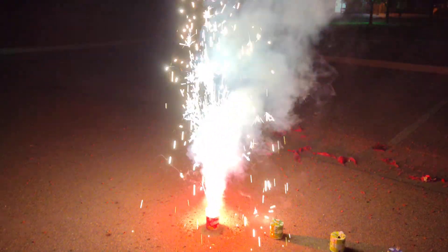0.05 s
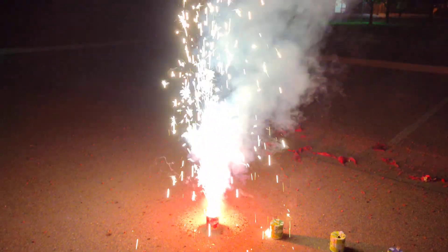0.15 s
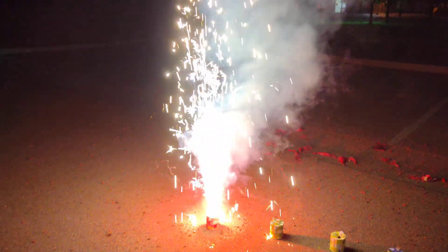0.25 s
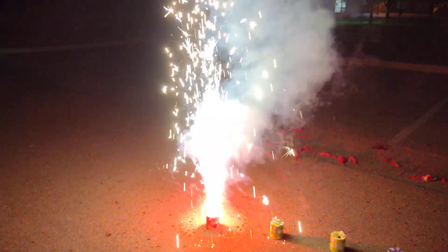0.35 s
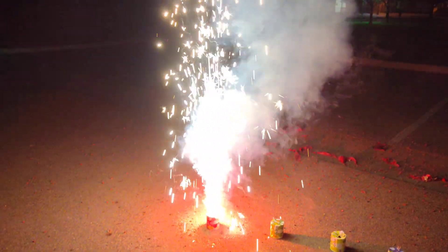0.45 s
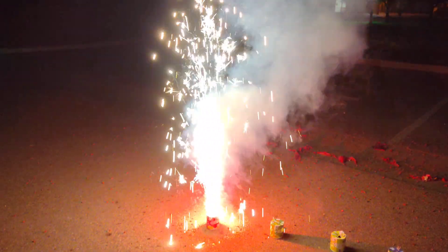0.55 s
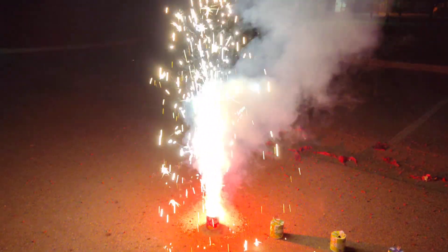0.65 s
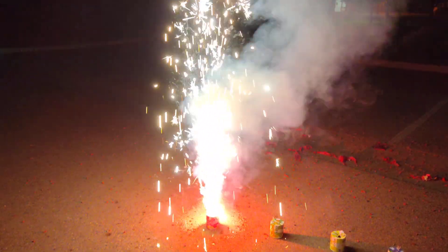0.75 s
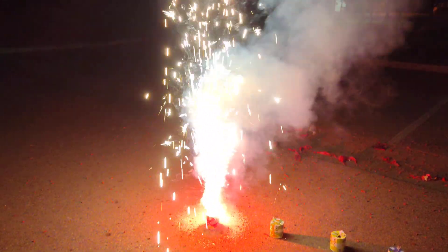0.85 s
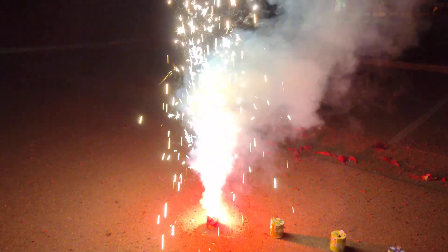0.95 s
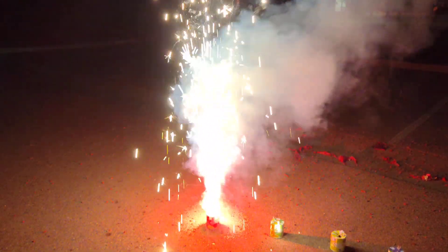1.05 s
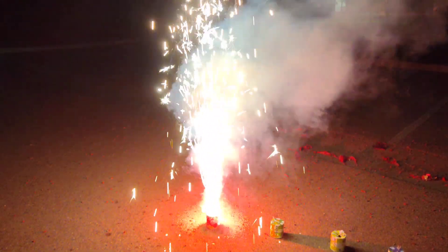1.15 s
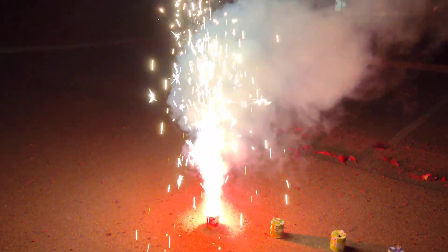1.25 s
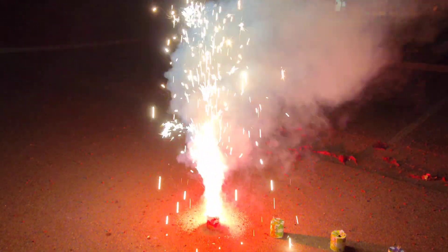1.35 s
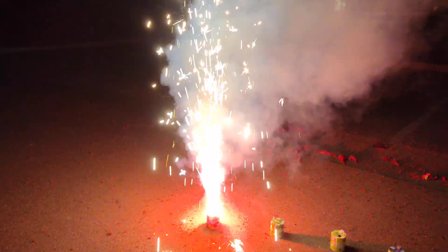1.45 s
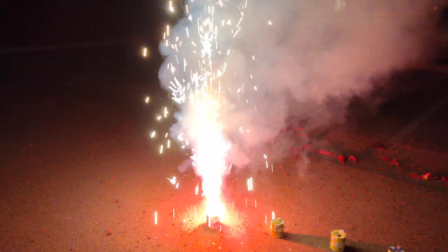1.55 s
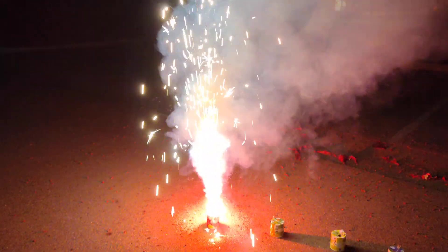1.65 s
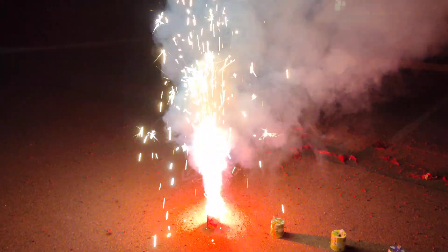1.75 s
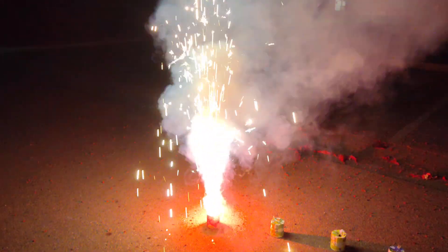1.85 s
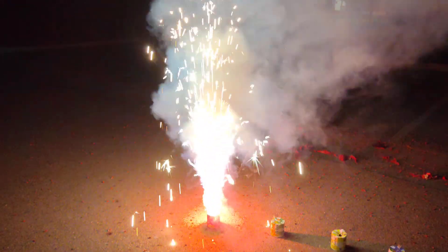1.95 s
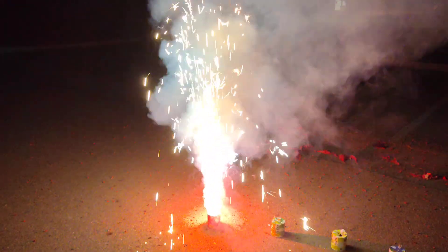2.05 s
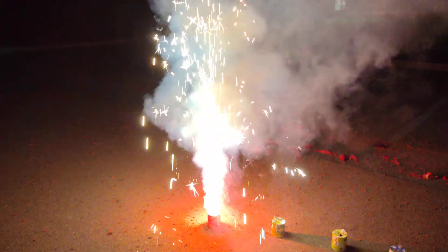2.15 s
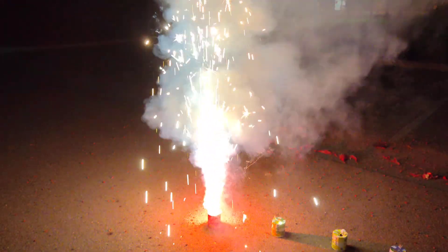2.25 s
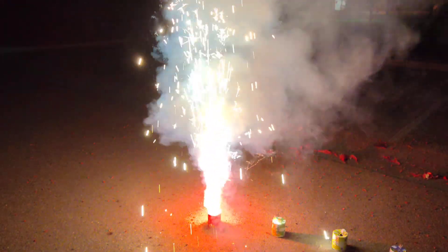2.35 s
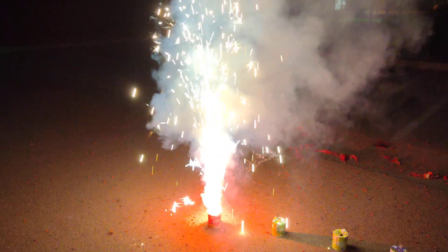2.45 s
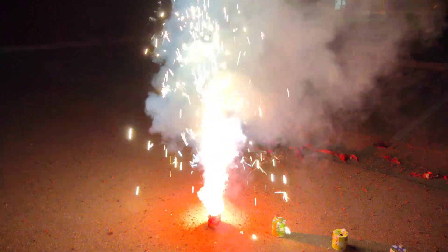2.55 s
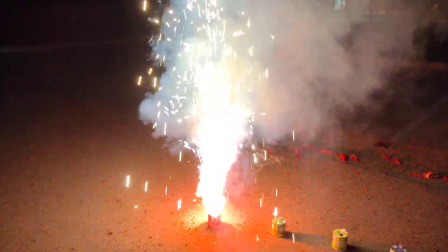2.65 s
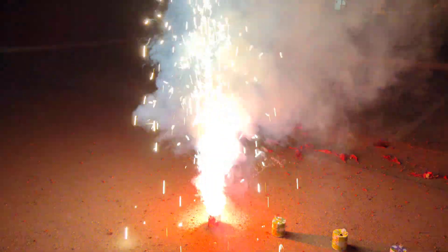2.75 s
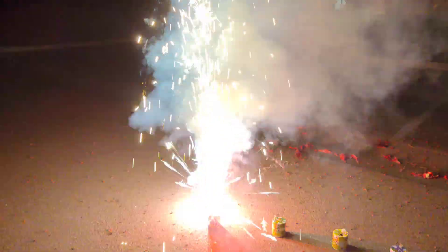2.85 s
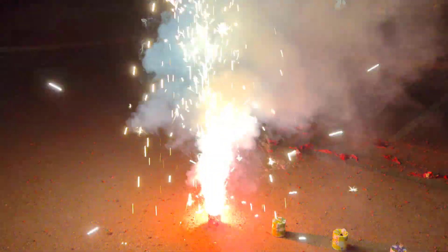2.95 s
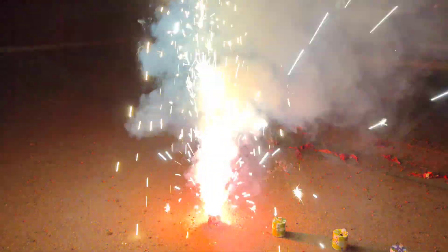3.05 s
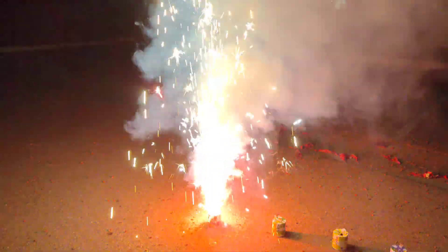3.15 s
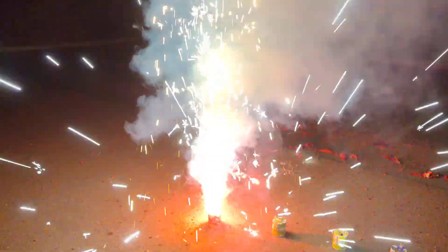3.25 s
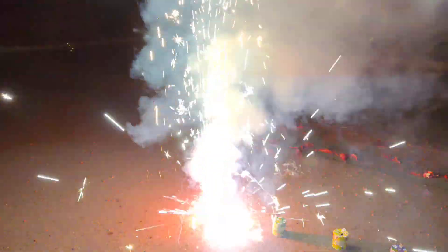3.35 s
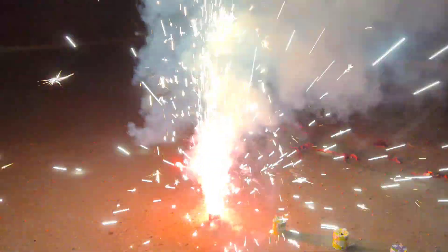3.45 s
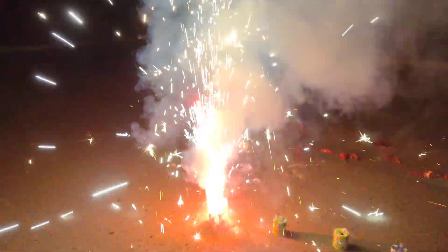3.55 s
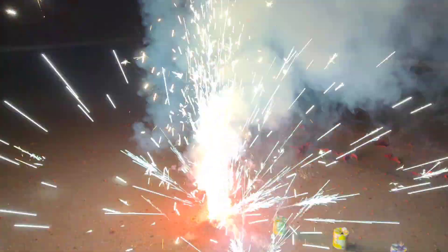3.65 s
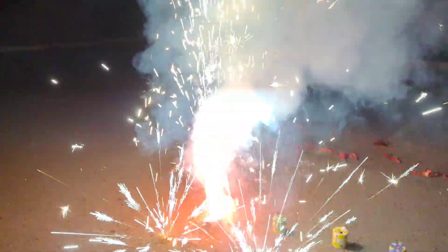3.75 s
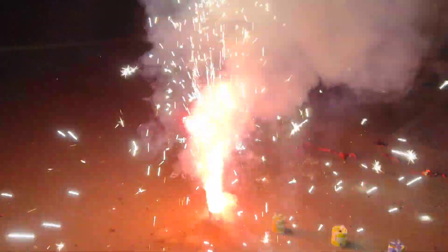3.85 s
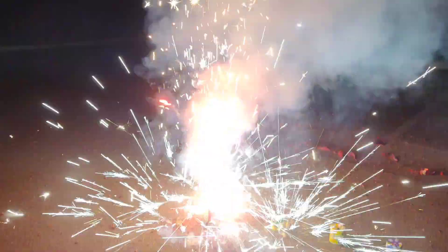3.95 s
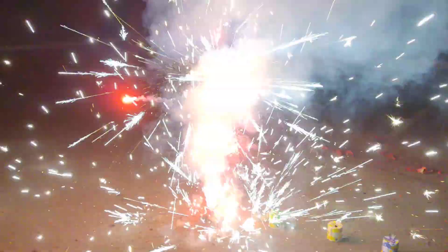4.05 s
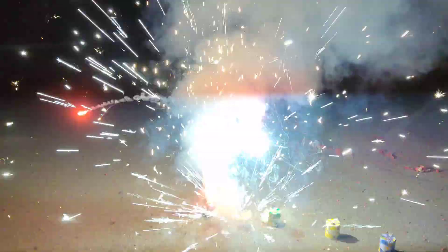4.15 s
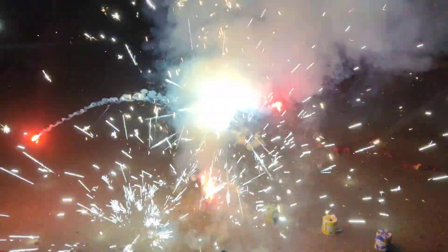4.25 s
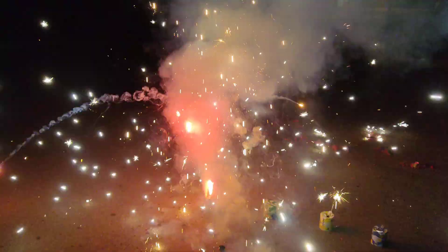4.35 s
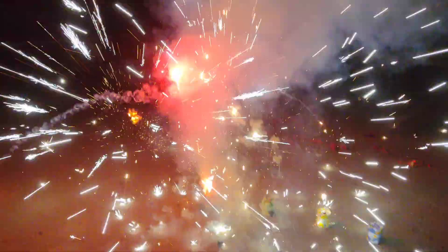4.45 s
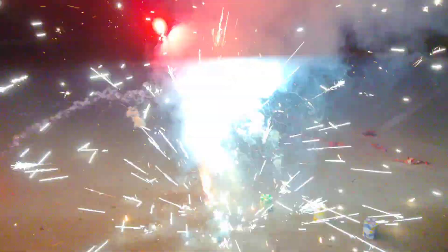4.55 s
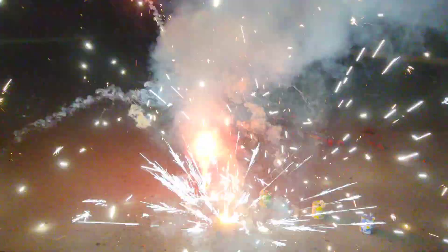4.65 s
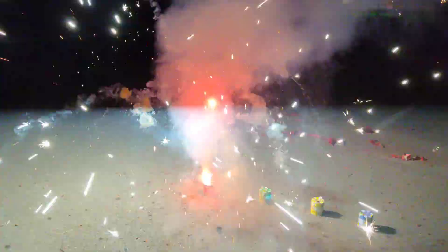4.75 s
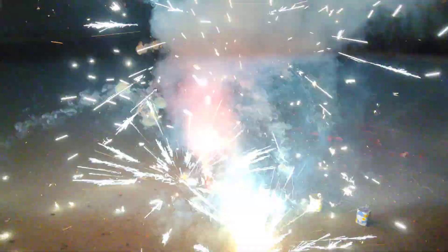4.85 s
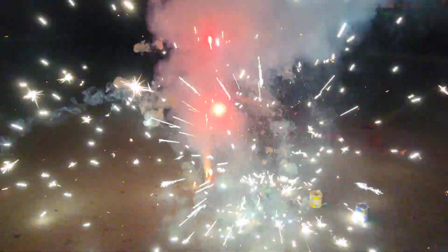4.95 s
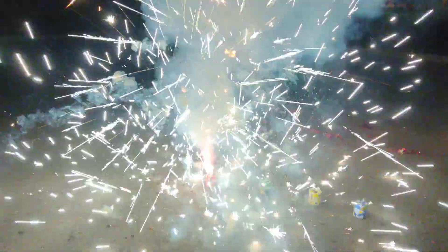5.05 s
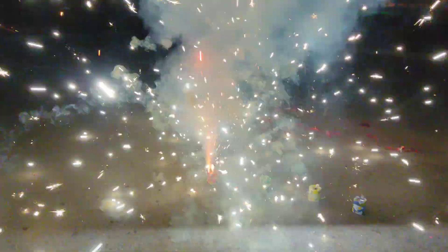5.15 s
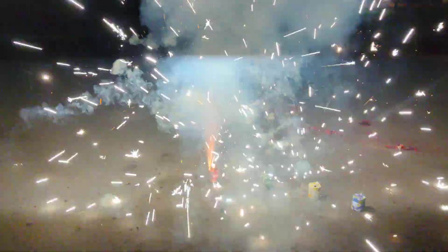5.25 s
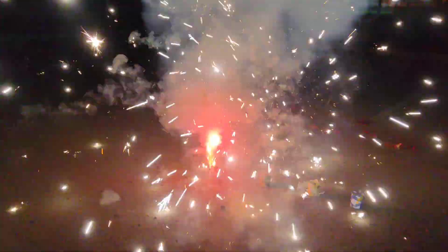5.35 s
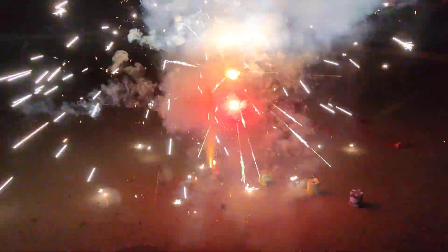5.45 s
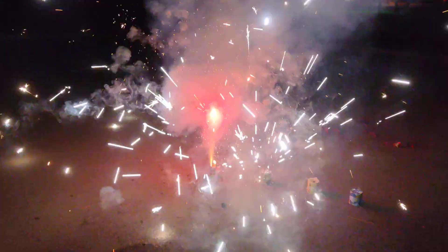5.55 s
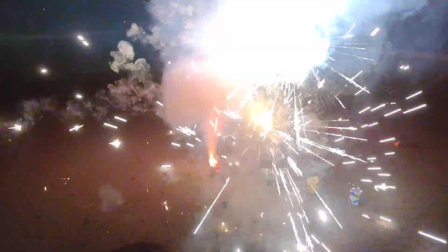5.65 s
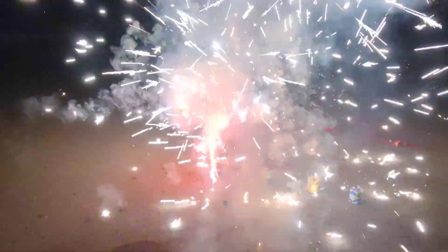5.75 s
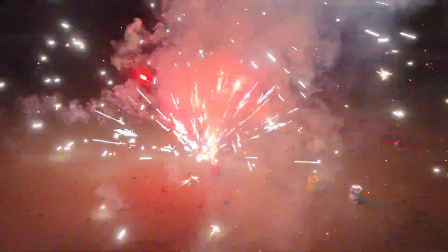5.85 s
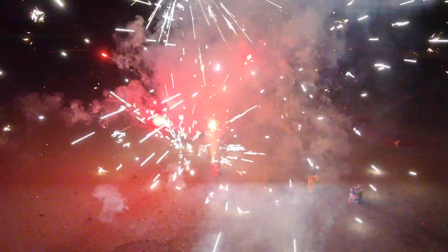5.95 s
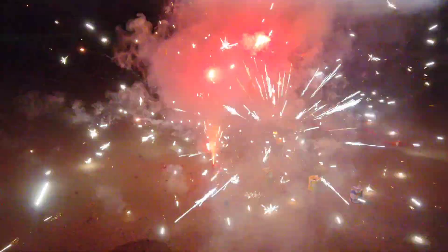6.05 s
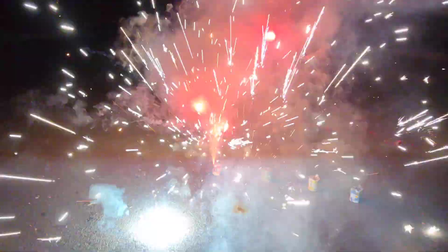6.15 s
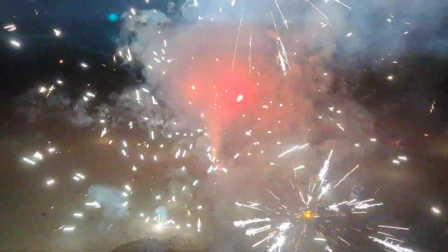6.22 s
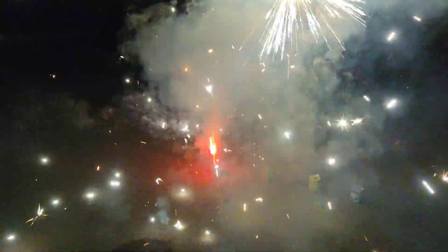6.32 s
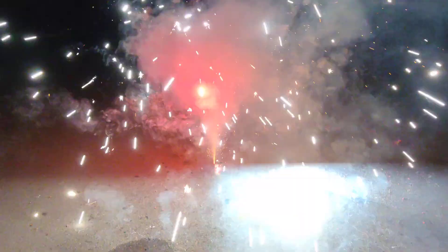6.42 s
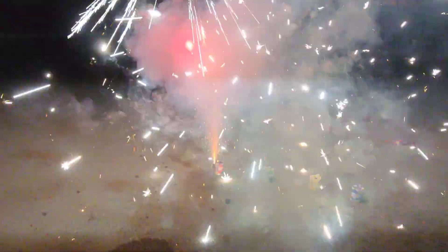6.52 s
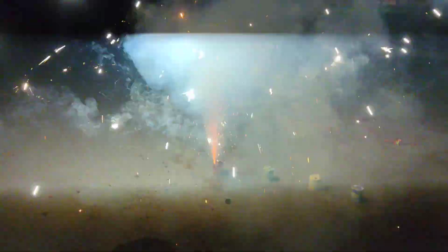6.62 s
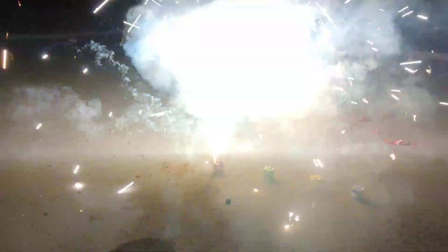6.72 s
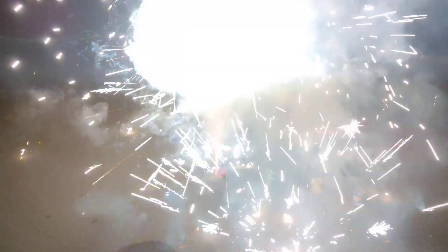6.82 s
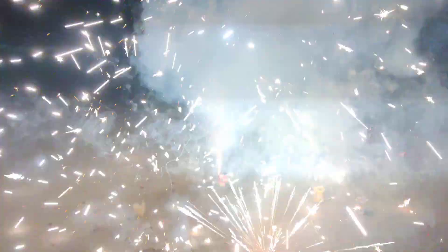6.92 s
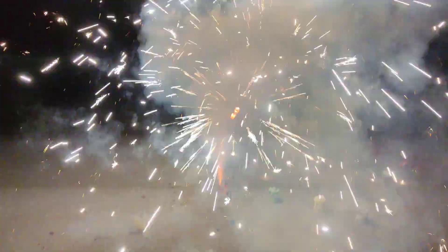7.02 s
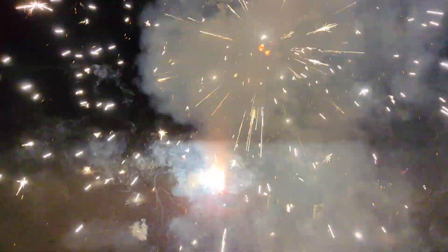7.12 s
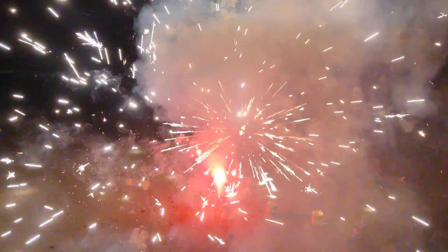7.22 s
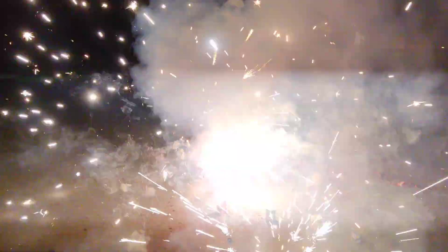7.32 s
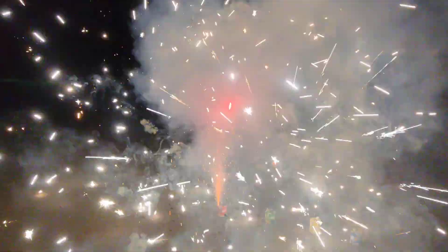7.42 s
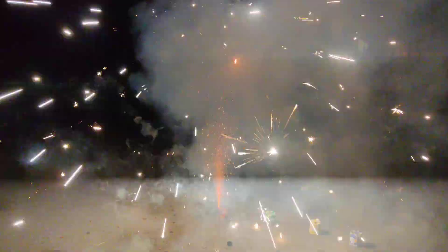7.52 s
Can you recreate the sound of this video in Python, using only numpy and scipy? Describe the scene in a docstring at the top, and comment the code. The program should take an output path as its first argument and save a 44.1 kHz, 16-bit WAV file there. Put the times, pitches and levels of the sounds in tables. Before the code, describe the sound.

A small ground firework hisses and roars outdoors, then breaks into loud, dense, rapid crackling with sharp bangs and a deep boom underneath.

```python
"""A small fountain firework burns on asphalt at night: first its jet roars, hisses and puffs.
From 2.6 s crackling stars take over, over a deep boom, while the roar dies away and the hiss goes on.
Each star is a noise crack echoed by the ground, with a dull blast; it may set off a lesser one.
Its sparks, dense random ticks, fizz a moment later; swarms and quick volleys thicken the crackle.
The blasts overload two microphone ports, and the gain control sinks at each bang."""
import sys
import numpy as np
from scipy import signal
from scipy.fft import rfft, irfft, next_fast_len
from scipy.io import wavfile
from scipy.ndimage import uniform_filter1d, map_coordinates

SR = 44100
rng = np.random.default_rng(int(sys.argv[2]) if len(sys.argv) > 2 else 0)


def transcribe(u):
    """Save the signal u as a 16-bit wav file named by the first command-line argument.

    u: samples, shape (n,) or (channels, n), limited to [-1, 1]; the rate is SR.
    q: integer samples, one column per channel.
    """
    v = np.clip(np.atleast_2d(u).T, -1, 1)
    q = np.round(v * 32767).astype(np.int16)
    wavfile.write(sys.argv[1], SR, q)


N = 334278

LIFT_DB = 9.5  # gain added while nothing bangs
JET_LEAN_DB, CRACKLE_LEAN_DB = -0.5, 0.88  # added left, taken off right


def amp(db):
    """Decibels to gain."""
    return 10 ** (np.asarray(db) / 20)


def unit(x):
    """x at rms 1."""
    return x / np.sqrt(np.mean(x ** 2) + 1e-20)


def lean(db):
    """Left and right gains."""
    return amp(db * np.array([[1], [-1]]))


def along(points, hz):
    """(f/Hz, value) points read on a log-frequency axis."""
    f, v = np.transpose(points)
    return np.interp(np.log(hz + 1), np.log(f + 1), v)


def curves(rows):
    """One value per sample for each column after the time."""
    s, *cols = np.transpose(rows)
    return [np.interp(np.arange(N) / SR, s, c) for c in cols]


def wobble(rate_hz):
    """Smooth random curve, rate_hz knots a second."""
    knots = rng.standard_normal(int(N * rate_hz / SR) + 4)
    return map_coordinates(knots, [np.arange(N) * rate_hz / SR])


def fall(t, life_s):
    """Exponential decay that starts at t = 0."""
    return (t >= 0) * np.exp(-np.abs(t) / life_s)


def swell(s, rise_s, fall_s):
    """Bell-shaped envelope that tops at s seconds."""
    t = np.arange(N) / SR - s
    return np.exp(-(t / np.where(t < 0, rise_s, fall_s)) ** 2 / 2)


def add(track, s, sound):
    """Mix a sound into a track at s seconds."""
    part = track[:, round(s * SR):][:, :sound.shape[-1]]
    part += sound[..., :part.shape[1]]


def filtered(x, response):
    """x times a complex response of frequency."""
    m = next_fast_len(N + SR // 2)
    return irfft(rfft(x, m) * response(np.fft.rfftfreq(m, 1 / SR)), m)[..., :N]


def reflected(x, paths):
    """x with its early reflections added."""
    def response(hz):
        return 1 + sum(gain * np.exp(-2j * np.pi * hz * s) for s, gain in paths)
    return filtered(x, response)


def pair(own, size):
    """Stereo white noise: a common part plus each side's own."""
    return (rng.standard_normal(size) + own * rng.standard_normal((2, size))) / np.hypot(1, own)


def ticks(rate_hz, spread_db, lag_samples=12):
    """Random impulses of log-normal size, rms 1, each with its own lag at the two ports."""
    count = int(rate_hz * N / SR)
    draw = rng.random((count, 3))
    chance = rng.standard_normal((count, 3))
    at = (draw[:, :1] * (N - lag_samples) + draw[:, 1:] * lag_samples).astype(int)
    level_db = spread_db * np.clip(chance[:, :1], -2, 2) + 2 * chance[:, 1:]
    sizes = np.sign(chance[:, 1:]) * amp(level_db)
    return unit(np.array([np.bincount(at[:, side], sizes[:, side], N) for side in (0, 1)]))


def patchy(x, depth_db, size=5):
    """Colour that shifts from one moment and band to the next."""
    z = signal.stft(x, nperseg=256)[2]
    field = uniform_filter1d(rng.standard_normal(z.shape), size, 2)
    field = uniform_filter1d(field, size - 2, 1)
    return signal.istft(z * amp(depth_db * unit(field)), nperseg=256)[1][:, :N]


# resonance of each microphone port: f/Hz, level/dB
LEFT_PORT = [(500, -1), (1200, 2), (2000, 2), (3000, 3), (4000, 7), (4750, 10.5), (5300, 10), (5800, 6.5),
             (7000, 5.5), (8000, -2), (9500, -1), (11500, -7.5), (15000, -11.5)]
RIGHT_PORT = [(500, -2.5), (1800, 0.5), (3200, 1), (5000, 4.5), (6000, 8.5), (6850, 13), (7400, 6.5),
              (8000, 2), (9000, -4.5), (12000, -7), (13500, -7), (15000, -13)]


def through_ports(x, spectrum, size=8192):
    """x given a spectrum and rung through both ports: minimum phase, mean energy gain 1."""
    hz = np.fft.rfftfreq(size, 1 / SR)
    ports_db = np.array([along(LEFT_PORT, hz), along(RIGHT_PORT, hz)])
    gain = amp(along(spectrum, hz) + ports_db)
    cepstrum = irfft(np.log(gain))
    causal = np.r_[1, np.full(size // 2 - 1, 2), np.zeros(size // 2)]
    ring = irfft(np.exp(rfft(cepstrum * causal)))
    ring = ring / np.sqrt(np.sum(ring ** 2) / 2)
    return signal.fftconvolve(np.atleast_2d(x), ring, axes=1)[:, :N]


# deep boom between bangs: t/s, level/dB
BOOM_LEVEL = [(2.93, -75), (3.0, -33), (3.5, -34), (7.5, -33)]
# boom spectrum: f/Hz, density/dB per Hz
BOOM_SPECTRUM = [(10, -1), (30, -15), (60, -24), (150, -47), (600, -88)]


def deep_boom():
    """Low noise, steep towards the bass, that sets in as the stars take over."""
    return amp(curves(BOOM_LEVEL)[0]) * unit(through_ports(pair(own=0.7, size=N), BOOM_SPECTRUM))


# street decay: f/Hz, t60/s
STREET_DECAY = [(200, 0.26), (3000, 0.68), (12000, 0.97)]


def street(x):
    """Houses along the street answer faintly: a decaying noise tail whose treble lasts longest."""
    hz, t, z = signal.stft(rng.standard_normal((2, SR // 2)), SR, nperseg=256)
    decay = amp(-60 * t / along(STREET_DECAY, hz)[:, None])
    tail = signal.istft(z * decay, SR, nperseg=256)[1]
    return signal.fftconvolve(x, tail / np.linalg.norm(tail[0]), axes=1)[:, :N]


# jet hiss: t/s, level/dB
JET_HISS = [(0.0, -30), (0.05, -27), (0.135, -25), (0.155, -29.5), (0.27, -29), (0.62, -29.5), (1.05, -29),
            (1.75, -29), (2.1, -26), (2.25, -26.5), (2.57, -23), (2.66, -25), (2.74, -26), (2.92, -26),
            (4.5, -25)]
# low puffs of gas: t/s, level over the rumble/dB
PUFFS = [(0.17, 5), (1.29, 4), (1.5, 7), (2.35, 8.5)]
# jet spectra: f/Hz, density/dB per Hz; sputter = grains spitting in the flame
RUMBLE_SPECTRUM = [(20, -16), (35, -5), (55, -2), (95, 3.5), (130, -6.5), (220, -38)]
ROAR_SPECTRUM = [(80, -23), (140, -4), (260, 0.5), (390, -6.5), (540, 3.5), (680, -0.5), (800, -12),
                 (930, -15.5), (1500, -14), (3000, -57)]
HISS_SPECTRUM = [(950, -4.5), (1400, -2.5), (1950, 3.5), (2270, 0), (2500, 3.5), (2760, -1.5), (2980, 3),
                 (3900, -2.5), (4330, 1.5), (4560, -1), (4770, 1.5), (4980, -0.5), (5230, 1.5),
                 (5600, -2.5), (5900, -3.5), (6200, -5.5), (6700, -8.5), (9300, -6.5), (15000, -7.5)]
SPUTTER_SPECTRUM = [(1500, -14), (4000, 3), (8000, 8), (11000, -3), (15000, -6)]
# early reflections of the jet at each port: delay/s, gain (linear)
LEFT_PATHS = [(.00024, .69), (.00159, .4), (.001975, .23), (.00253, .16)]
RIGHT_PATHS = [(.000126, .34), (.00045, .31), (.00056, .25), (.00198, .14)]
PUFF_S = 0.056  # half length
# from here the jet's roar and rumble die away while its hiss goes on
FADE_START_S, FADE_DB_PER_S = 2.9, 13.5
ROAR_DB, RUMBLE_DB = -34, -44  # before the fade and LIFT_DB
ROAR_DB_PER_HISS_DB = 0.25
SPUTTER_DB, SPUTTER_DB_PER_HISS_DB = -9.5, 2.6  # level re mean hiss; growth


def jet(scattered=0.83, spit=0.58, flutter_db=0.52, heave_db=6.0):
    """Gas rushes from the tube: turbulent roar, hiss combed by near surfaces, sputter growing with effort."""
    fading_s = np.maximum(np.arange(N) / SR - FADE_START_S, 0)
    hiss_db, = curves(JET_HISS)
    effort_db = hiss_db - hiss_db.mean()

    puffs_db = sum(db * swell(s, PUFF_S, PUFF_S) for s, db in PUFFS)
    rumble_db = RUMBLE_DB + puffs_db + heave_db * wobble(5.4)
    rumble = amp(rumble_db) * through_ports(pair(own=0.1, size=N), RUMBLE_SPECTRUM)
    roar_db = ROAR_DB + ROAR_DB_PER_HISS_DB * effort_db + 1.5 * wobble(34.86)
    roar = amp(roar_db) * through_ports(pair(own=0.15, size=N), ROAR_SPECTRUM)

    nozzle = rng.standard_normal(N)
    grains = scattered * rng.standard_normal((2, N)) + spit * ticks(rate_hz=1600, spread_db=14.0)
    grains = grains + np.array([reflected(nozzle, LEFT_PATHS), reflected(nozzle, RIGHT_PATHS)])
    hiss = unit(through_ports(patchy(grains, depth_db=1.0, size=9), HISS_SPECTRUM))
    hiss = amp(hiss_db + flutter_db * wobble(90)) * hiss

    sputter_db = hiss_db.mean() + SPUTTER_DB + SPUTTER_DB_PER_HISS_DB * effort_db
    sputter = amp(sputter_db) * through_ports(ticks(rate_hz=690, spread_db=-2.0), SPUTTER_SPECTRUM)
    fade = amp(-FADE_DB_PER_S * fading_s)
    return amp(-LIFT_DB) * (fade * (rumble + roar) + hiss + sputter)


# spark swarms flaring up: t of the peak/s, relative level/dB
SWARMS = [(3.18, -33.5), (3.421, -29), (3.56, -25.5), (3.86, -23), (3.97, -28.5), (4.181, -13),
          (4.428, -20), (4.5, -34), (4.71, -22.5), (5.039, -41), (5.249, -19), (5.72, -27.5), (6.08, -21.5),
          (6.28, -24.5), (6.38, -27.5), (6.521, -25), (6.73, -26.5), (6.85, -23), (6.96, -17),
          (7.04, -13.5), (7.178, -16.5), (7.33, -24.5), (7.56, -23)]
# spark spectrum: f/Hz, density/dB per Hz
SPARK_SPECTRUM = [(60, -11), (250, -10.5), (600, -3), (1100, -7), (2200, 3), (4000, 0), (7000, 0.5),
                  (9000, -0.5), (15000, -5.5)]
CHAIN_S, CHAIN_FULL_S = 3.3, 4.04  # over this span shedding and chain chance grow to full
SHED_DB, SHED_DELAY_S, SHED_RISE_S = -19, 0.013, 0.025  # level re the crack, before level_db
SWARM_RISE_S, SWARM_FALL_S = 0.043, 0.048


def fizz(level_db=5.5, snaps=0.31, flutter_db=1.5, sparse_db=-12):
    """Thousands of tiny sparks burst in the wake of stars and in swarms, some sharper snaps among them."""
    shed_power = np.zeros((1, N))
    age = np.arange(SR // 2) / SR / SHED_RISE_S
    for s, crack_db, _ in STARS:
        early_db = np.interp(s, [CHAIN_S, CHAIN_FULL_S], [sparse_db, 0])  # first stars shed little
        shed = amp(crack_db + SHED_DB + early_db) * age * np.exp(1 - age)
        add(shed_power, s + SHED_DELAY_S, shed ** 2)
    swarm_power = sum((amp(db) * swell(s, SWARM_RISE_S, SWARM_FALL_S)) ** 2 for s, db in SWARMS)
    level = np.sqrt(shed_power[0] + swarm_power) * amp(level_db + flutter_db * wobble(70))
    sparks = ticks(rate_hz=9000, spread_db=6.0) + snaps * ticks(rate_hz=150, spread_db=8.0)
    return level * through_ports(unit(patchy(sparks, depth_db=3.0)), SPARK_SPECTRUM)


THIN_BLAST_DB, THIN_RANGE_DB = -25, 5.5  # below this blast, stars snap ever thinner


def thinness(blast_db):
    """0 for a star that bangs, 1 for one that only snaps."""
    return np.clip((THIN_BLAST_DB - blast_db) / THIN_RANGE_DB, 0, 1)


PUSH_DB, PUSH_SCATTER_DB = 3.5, 1.6  # shove re the blast, before thump_db
STOP = 0.39  # offset limit of a diaphragm, linear amplitude


def overload(rows, thump_db=1.0, rise_s=0.00046, settle_s=0.075, swing_hz=5, numb_s=0.011, reach=0.1):
    """Blasts shove each diaphragm towards its stop; it swings back slowly. Thump, strain, directions."""
    thump, strain = np.zeros((2, 2, N))
    throws = []
    t = np.arange(SR // 4) / SR
    shove = (1 - fall(t, rise_s)) * fall(t, settle_s) * np.cos(2 * np.pi * swing_hz * t)
    for s, _, blast_db in rows:
        push_db = blast_db + PUSH_DB + PUSH_SCATTER_DB * rng.standard_normal((2, 1))
        push = (1 - thinness(blast_db)) * amp(push_db)
        # far out, it tends to be thrown to the other side
        offset = thump[:, [round(s * SR)]]
        throw = np.sign(reach * pair(own=1.8, size=1) - offset)
        travel = np.minimum(amp(thump_db) * push, np.abs(STOP - throw * offset))
        add(thump, s, throw * travel * shove)
        add(strain, s, push * fall(t, numb_s))
        throws.append(throw)
    return thump, strain, throws


# short runs of stars about 12 ms apart: start/s, length/s, mean crack/dB, mean blast/dB
VOLLEYS = [(4.173, .022, -3, -17), (4.672, .014, -11, -23.5), (5.163, .022, -10, -20),
           (6.053, .02, -11.5, -24.5), (6.814, .025, -15, -21), (6.945, .05, -9, -19),
           (7.039, .03, -10, -23.5), (7.172, .022, -7, -20.5)]
VOLLEY_GAP_S, VOLLEY_JITTER, VOLLEY_SCATTER_DB = 0.012, 0.4, 1  # mean gap, its spread (share), level sd


def volleys(most=12):
    """Stars going off in quick, uneven succession: (t/s, crack/dB, blast/dB)."""
    rows = []
    for start_s, length_s, crack_db, blast_db in VOLLEYS:
        gaps_s = VOLLEY_GAP_S * (1 + VOLLEY_JITTER * rng.uniform(-1, 1, most))
        waits_s = np.cumsum(gaps_s) - gaps_s[0]
        scatter_db = VOLLEY_SCATTER_DB * rng.standard_normal((most, 2))
        for wait_s, (a, b) in zip(waits_s, scatter_db):
            if wait_s < length_s:
                rows.append((start_s + wait_s, crack_db + a, blast_db + b))
    return rows


# bursting stars: t/s, crack level/dB, blast level/dB
STARS = [(2.605, -13.5, -33), (2.7826, -13.5, -40), (2.9883, -10, -20), (3.014, -23, -42),
         (3.0772, -22, -41), (3.119, -9.5, -23), (3.146, -17.5, -43), (3.2079, -17.5, -49),
         (3.3186, -7.5, -24), (3.341, -11.5, -27), (3.367, -17, -43), (3.4081, -22, -48),
         (3.4193, -10, -27), (3.446, -16.5, -45), (3.4933, -6.5, -22), (3.519, -14, -26.5),
         (3.532, -9, -26.5), (3.6204, -9, -22.5), (3.648, -21.5, -45), (3.7035, -8.5, -23.5),
         (3.7306, -25, -43), (3.7393, -10.5, -23.5), (3.765, -18, -34.5), (3.7753, -13, -18.5),
         (3.7835, -13, -22), (3.8003, -19, -34), (3.809, -14, -39), (3.8754, -5.5, -25), (3.8922, -14, -27),
         (3.9021, -18, -26), (3.9203, -20, -44), (3.965, -17, -28), (3.9834, -19, -34),
         (4.015, -8.5, -21.5), (4.057, -12, -16.5), (4.0714, -19, -17), (4.0768, -13, -23.5),
         (4.0888, -12, -26), (4.1022, -14, -20), (4.115, -13, -23), (4.128, -12, -20.5),
         (4.1416, -13, -20.5), (4.1657, -4.5, -18.5), (4.2087, -6, -26.5), (4.257, -5, -18.5),
         (4.281, -10, -27), (4.2928, -7, -28.5), (4.309, -6.5, -23), (4.328, -12, -20), (4.353, -10, -20),
         (4.3721, -7, -19.5), (4.3853, -7.5, -27), (4.3964, -13, -31.5), (4.5422, -7, -19.5),
         (4.553, -15, -16.5), (4.572, -9.5, -25.5), (4.5955, -21, -43), (4.6218, -11, -7),
         (4.664, -9.5, -19), (4.6899, -8, -19.5), (4.7463, -10, -25.5), (4.7718, -22, -39),
         (4.784, -6, -21), (4.8087, -18, -38), (4.8483, -8.5, -21.5), (4.873, -20, -41), (4.8936, -7, -26),
         (4.91, -10.5, -21), (4.932, -8, -24), (4.9627, -9.5, -23), (4.9796, -9, -24.5),
         (4.9902, -4, -18.5), (5.005, -4.5, -27), (5.031, -21, -35), (5.0664, -13.5, -20), (5.121, -5, -20),
         (5.1296, -14, -27), (5.139, -0.5, -21), (5.206, -9, -24), (5.2186, -4.5, -21), (5.3028, -6, -25),
         (5.317, -6, -19.5), (5.3277, -10, -23), (5.3566, -11, -16), (5.39, -8, -22), (5.4391, -8, -18),
         (5.449, -10, -14.5), (5.5278, -9, -23), (5.549, -9.5, -18), (5.5803, -10, -26), (5.6303, -7, -15),
         (5.6503, -12.5, -20), (5.661, -13.5, -19.5), (5.6838, -20, -45), (5.7368, -16, -28.5),
         (5.7442, -11.5, -9), (5.7686, -19, -39), (5.7786, -6.5, -21.5), (5.8048, -9, -20.5),
         (5.85, -5.5, -17.5), (5.8652, -6.5, -16), (5.917, -7.5, -24), (5.9397, -19, -42),
         (5.971, -9, -17.5), (6.0073, -8.5, -18), (6.033, -7.5, -23), (6.072, -10, -25),
         (6.1024, -7, -19.5), (6.1152, -5.5, -26), (6.139, -19, -30.5), (6.1762, -6.5, -25),
         (6.1886, -20, -40), (6.209, -3, -14), (6.232, -11, -17), (6.2615, -8.5, -27.5), (6.296, -6.5, -15),
         (6.318, -31, -42), (6.336, -8.5, -14.5), (6.3402, -18, -19.5), (6.3444, -12, -16.5),
         (6.3492, -19, -21), (6.3615, -12.5, -45), (6.4267, -24, -46), (6.4416, -12.5, -15),
         (6.4771, -9.5, -18), (6.5003, -10, -22), (6.563, -8, -24.5), (6.589, -21, -39), (6.609, -6.5, -14),
         (6.6319, -9, -21), (6.6573, -9.5, -16), (6.6811, -23, -35.5), (6.756, -11, -26), (6.778, -23, -55),
         (6.8023, -12, -16), (6.851, -11.5, -27.5), (6.86, -11, -18), (6.9107, -5.5, -19),
         (6.919, -17, -19), (6.9345, -9, -22), (7.002, -14, -24), (7.015, -5.5, -19.5), (7.0841, -5, -18),
         (7.0952, -8, -19), (7.1114, -7, -18), (7.133, -15, -34), (7.1463, -7, -18.5), (7.163, -11, -19.5),
         (7.2406, -10, -23.5), (7.2655, -10, -22), (7.2892, -7, -23.5), (7.306, -12, -22),
         (7.317, -10, -26.5), (7.348, -5.5, -18.5), (7.3713, -13, -42), (7.3806, -4, -19.5),
         (7.4334, -8, -16.5), (7.461, -5.5, -22), (7.4826, -7, -21.5), (7.5028, -10.5, -17),
         (7.5256, -25, -36), (7.5363, -5, -20.5)]
CHAIN_CHANCE = 0.06  # full chance that a star sets off a lesser one
CHAIN_GAP_S, CHAIN_SPREAD_S, CHAIN_DB = 0.004, 0.011, -5.5  # shortest delay, extra delay, level re parent


def bursts():
    """Every star and the lesser one that it may set off: (t/s, crack/dB, blast/dB)."""
    rows = list(STARS)
    for (s, crack_db, blast_db), (luck, wait) in zip(STARS, rng.random((len(STARS), 2))):
        chance = CHAIN_CHANCE * np.clip((s - CHAIN_S) / (CHAIN_FULL_S - CHAIN_S), 0, 1)
        if luck < chance:
            chain_s = s + CHAIN_GAP_S + CHAIN_SPREAD_S * wait
            rows.append((chain_s, crack_db + CHAIN_DB, blast_db + CHAIN_DB))
    return [row for row in rows if row[0] < (N - 1) / SR]


# star spectra: f/Hz, density/dB per Hz; snap = a thin crack
CRACK_SPECTRUM = [(200, -3), (900, 4), (2000, 2.5), (4000, 3.5), (7000, 3.5), (10000, 1.5), (15000, 9.5)]
SNAP_SPECTRUM = [(300, -37), (1200, -3.5), (2500, 1.5), (5000, 2.5), (7000, 4), (9500, 5), (15000, -6)]
BLAST_SPECTRUM = [(30, 7.5), (110, 3.5), (250, 2.5), (620, 0), (1100, -13.5), (2000, -37.5), (5000, -34)]
# bigger blasts are deeper: the treble edge drops an octave per step
BLAST_EDGE_HZ, USUAL_BLAST_DB, DB_PER_OCTAVE = 2340, -18.5, 0.5


def burst(x):
    """x with the energy of rms 1 over 5 ms at each port."""
    return x * np.sqrt(SR * 0.005 / np.sum(x ** 2, axis=1, keepdims=True))


def stars(rows, throws, crack_gain_db=0.06, snap_gain_db=0.0, blast_gain_db=-0.25, crack_s=0.0005,
          ground=0.19, ground_life_s=0.0037, tint=0.5, sputter=0.045, sputter_s=0.00077, jagged=3.16,
          blast_s=0.0034, churn=0.08, stray_db=0.35):
    """Each star: a jagged crack, its echo off the asphalt about 2 ms later, a short sputter, a dull blast."""
    cracks, snaps, blasts = np.zeros((3, 2, N))
    t = np.arange(SR // 40) / SR
    for (s, crack_db, blast_db), throw in zip(rows, throws):
        detour_s = rng.uniform(0.0014, 0.0026)
        sides = lean(stray_db * rng.standard_normal())
        echo = (t >= detour_s) * np.exp(-((t - detour_s) / ground_life_s) ** 2)  # holds, then drops
        shape = fall(t, crack_s) + ground * echo + sputter * fall(t, sputter_s)
        # a few shock fronts dominate and colour each burst
        fronts = pair(own=2.8, size=len(t))
        shock = shape * np.sign(fronts) * np.abs(fronts) ** jagged
        split = round(rng.uniform(0.0001, 0.0004) * SR)  # the casing splits in two steps
        shock = shock + tint * rng.uniform(-1.03, 1) * np.roll(shock, split, axis=1)
        shock = amp(crack_db) * sides * burst(shock)
        thin = thinness(blast_db)
        add(cracks, s, amp(crack_gain_db) * (1 - thin) * shock)
        add(snaps, s, amp(snap_gain_db) * thin * shock)
        # one pressure pulse, churning gas behind it
        pulse = (t == 0) * throw
        gas = churn * fall(t, blast_s) * pair(own=1.4, size=len(t))
        edge_hz = BLAST_EDGE_HZ * 2 ** ((USUAL_BLAST_DB - blast_db) / DB_PER_OCTAVE)
        pole = np.exp(-2 * np.pi * edge_hz / SR)
        blast = signal.lfilter([1 - pole], [1, -pole], burst(pulse + gas))
        add(blasts, s, amp(blast_db + blast_gain_db) * blast)
    bangs = through_ports(cracks, CRACK_SPECTRUM) + through_ports(snaps, SNAP_SPECTRUM)
    return bangs + through_ports(blasts, BLAST_SPECTRUM)


def scene(street_db=-20, numb=14):
    """Jet, sparks and stars; a strained diaphragm hears jet, sparks and street less for a moment."""
    burning = lean(JET_LEAN_DB) * jet() + lean(CRACKLE_LEAN_DB) * fizz()
    rows = sorted(bursts() + volleys())
    thump, strain, throws = overload(rows)
    cracks = lean(CRACKLE_LEAN_DB) * stars(rows, throws)
    wash = burning + amp(street_db) * street(cracks)
    return cracks + thump + deep_boom() + wash / (1 + numb * strain)


def gain_control(x, bang=0.125, hold_s=0.074, release_s=0.054, size=44, count=8):
    """Quiet sound is lifted; the gain sinks a few blocks ahead of a bang and returns after a hold."""
    peaks = np.pad(np.abs(x).max(0), (0, -N % size)).reshape(-1, size).max(1)
    duck = np.clip(2 * (peaks / bang - 1), 0, 1)
    age_s = np.arange(SR // size // 2) * size / SR
    memory = np.clip(1 - (age_s - hold_s) / release_s, 0, 1)
    padded = np.pad(duck, (len(age_s) - 1 - count, count))
    past = np.lib.stride_tricks.sliding_window_view(padded, len(age_s))
    held = uniform_filter1d((past * memory[::-1]).max(1), count)
    held = np.interp(np.arange(N) / size, np.arange(len(held)), held)
    return x * amp(LIFT_DB * (1 - held))


TOP_HZ = 15500  # band limit


def record(dry, top=0.68, order=7):
    """Gain control, soft clipping and the camera's band limit."""
    x = gain_control(dry)
    x = x / (1 + np.abs(x / top) ** order) ** (1 / order)
    return filtered(x, lambda hz: 1 / np.sqrt(1 + (hz / TOP_HZ) ** 120))


dry = scene()
out = record(dry)
transcribe(out)
```